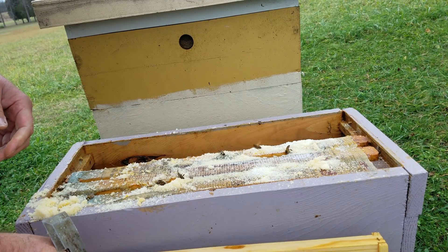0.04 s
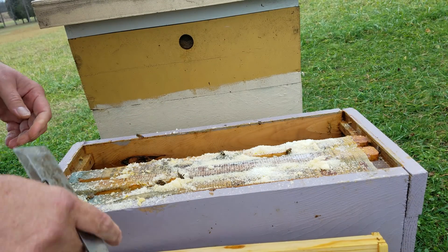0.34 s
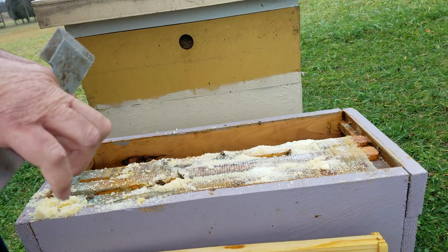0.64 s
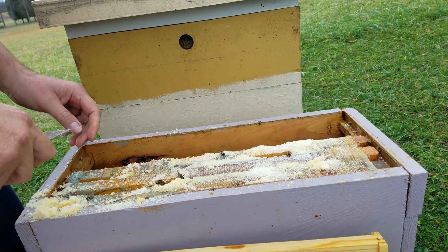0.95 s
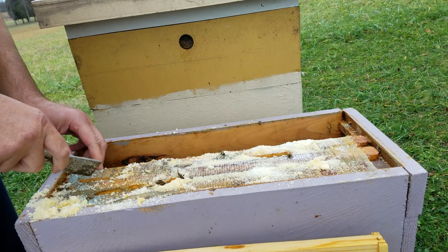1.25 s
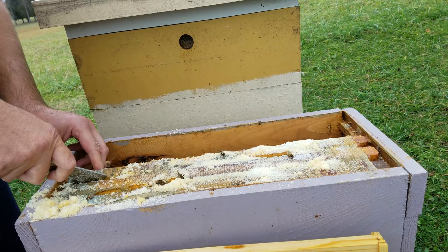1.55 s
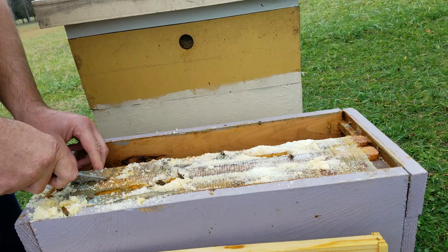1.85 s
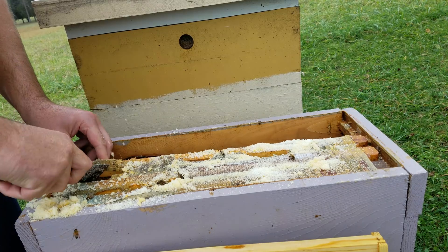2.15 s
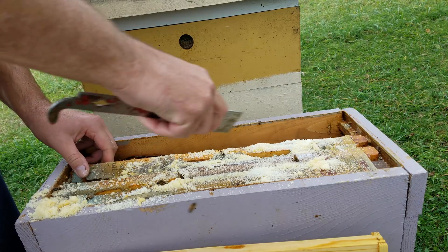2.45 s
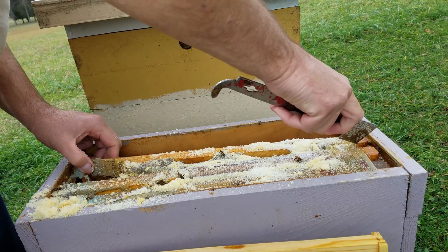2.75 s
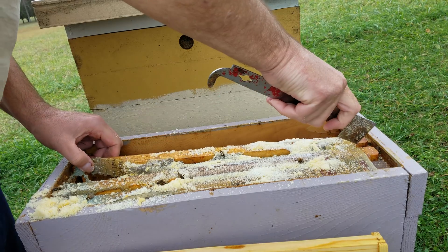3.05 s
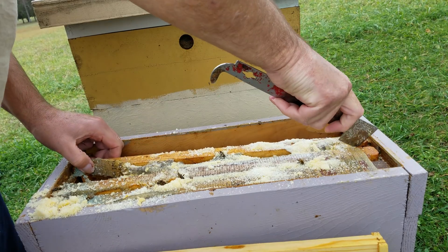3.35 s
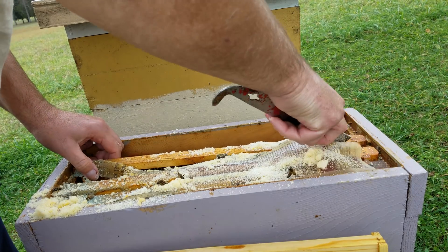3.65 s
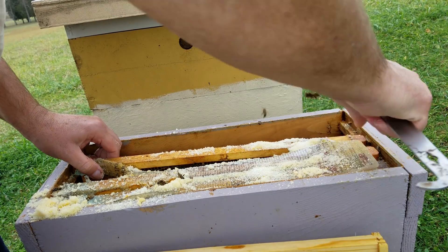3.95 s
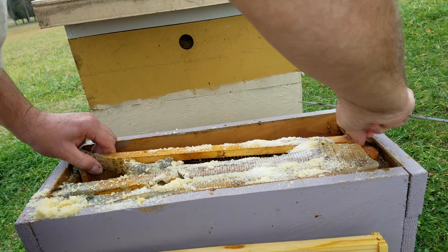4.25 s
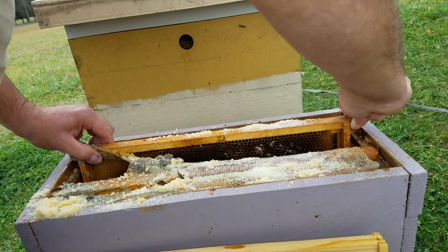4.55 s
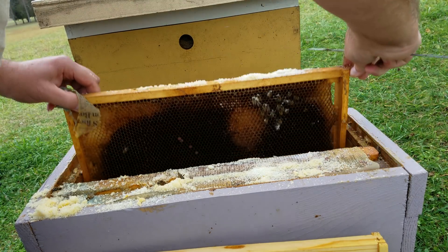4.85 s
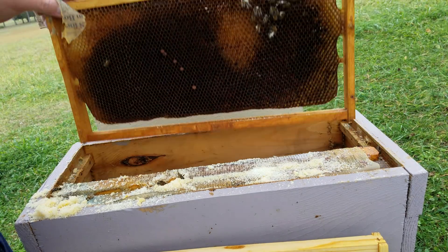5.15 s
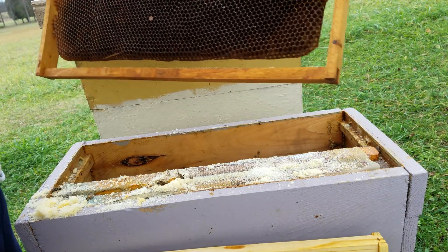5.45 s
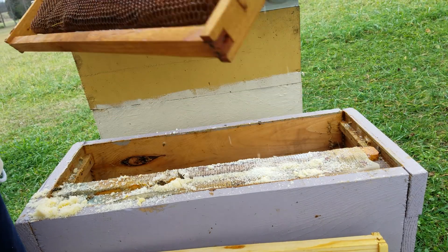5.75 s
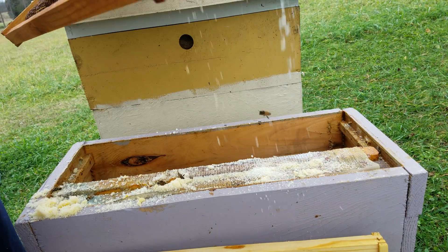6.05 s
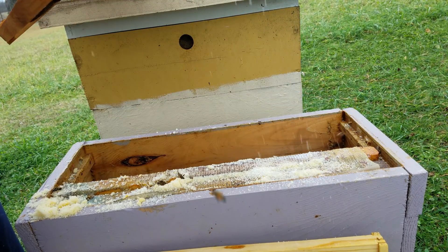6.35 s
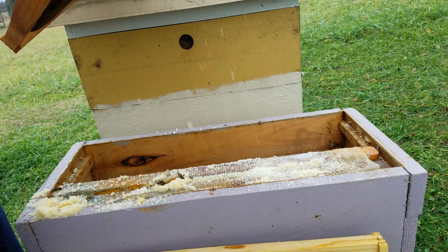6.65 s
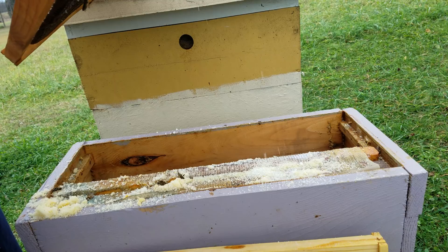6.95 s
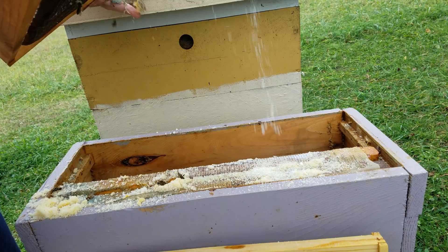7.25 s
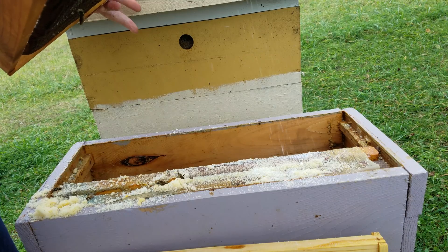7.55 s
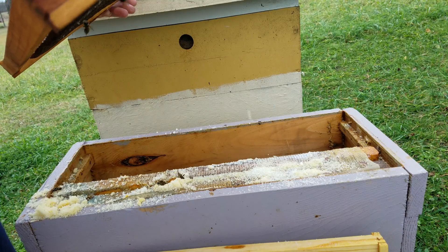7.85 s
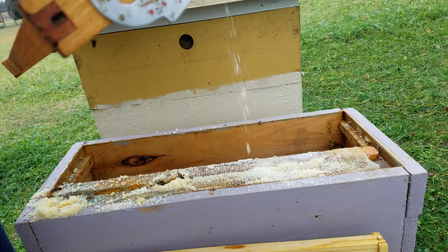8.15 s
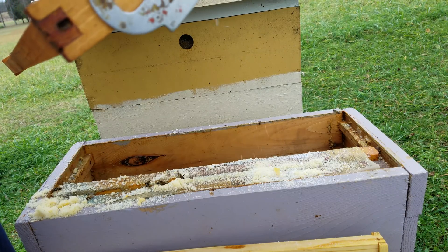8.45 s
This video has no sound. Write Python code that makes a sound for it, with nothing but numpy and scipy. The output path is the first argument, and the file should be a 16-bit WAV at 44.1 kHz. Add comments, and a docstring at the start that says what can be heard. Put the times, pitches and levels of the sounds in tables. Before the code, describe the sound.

Honeybees hum softly around an open hive outdoors, with a brief gust on the microphone at first. Close by, a steel tool scrapes wax and pries at a wooden frame, which breaks loose with sharp cracks and hollow knocks. After more scraping and crackling wax, the hum grows and single bees fly past. Drops patter lightly from the lifted comb, and a few small wooden taps follow.

```python
"""Honeybees hum around an open hive on a lawn, each wingbeat radiating a series of harmonics.
A steel hive tool pries a wooden frame loose: wax scrapes by stick-slip friction, the propolis seal
snaps, and blows excite the damped modes of box and frames. The hum grows as the frame comes out,
and drops fall from the lifted comb. A small gust brushes the microphones at first;
behind it all lie a soft outdoor wash and a faint low drone."""
import sys
import numpy as np
from scipy import signal
from scipy.fft import rfft, irfft
from scipy.io import wavfile
from scipy.ndimage import uniform_filter1d

SR = 44100
rng = np.random.default_rng(int(sys.argv[2]) if len(sys.argv) > 2 else 0)


def generate_wav(signal):
    """Clip the signal to [-1, 1] and save it as 16-bit WAV at the path in sys.argv[1]."""
    frames = np.transpose(np.atleast_2d(signal))
    scaled = np.clip(frames, -1, 1) * 32767
    pcm = np.round(scaled).astype(np.int16)
    wavfile.write(sys.argv[1], SR, pcm)


N = 378818
TIME = np.arange(N) / SR
LIFT_START_S, LIFT_DURATION_S = 2.5, 0.73
LIFTED = np.clip((TIME - LIFT_START_S) / LIFT_DURATION_S, 0, 1)  # 0: frame in the box, 1: frame out

# Spectrum of wood's densely overlapping modes: f/Hz, level/dB
WOOD_SPECTRUM = [(20, -52), (60, -12), (125, -9), (300, -0.5), (650, -2.5), (1000, -7), (1600, -10),
                 (2400, -9.5), (3300, -14), (4500, -20), (16000, -33)]
# Spectrum of tiny, sharp clicks: f/Hz, level/dB
CLICK_SPECTRUM = [(300, -60), (1500, 17), (3000, -0.5), (4300, 8.5), (5500, 3), (7000, 7.5), (8200, 1),
                  (9400, -8), (11000, -2), (13000, 0), (15800, -5.5)]


def amp(db):
    """Amplitude ratio of a level: a factor of ten per 20 dB."""
    return 10 ** (np.asarray(db) / 20)


def unit_rms(x):
    """Normalisation to unit mean power."""
    return x / np.sqrt(np.mean(x ** 2) + 1e-20)


def value_at(curve, hz):
    """Interpolation of a curve on a logarithmic frequency axis."""
    f, value = np.transpose(curve)
    return np.interp(np.log(hz + 1), np.log(f + 1), value)


def coloured(x, spectrum):
    """Filtering by multiplication in the frequency domain, at unit rms."""
    hz = np.fft.rfftfreq(x.shape[-1], 1 / SR)
    return unit_rms(irfft(rfft(x) * amp(value_at(spectrum, hz)), x.shape[-1]))


def drift(corner_hz, size=1024):
    """Slow random modulation: low-passed noise of unit rms."""
    hz = np.fft.rfftfreq(size, TIME[-1] / size)
    slow = irfft(rfft(rng.standard_normal(size)) / (1 + (hz / corner_hz) ** 2))
    return np.interp(TIME, np.linspace(0, TIME[-1], size), unit_rms(slow))


def noise(spectrum, size=384000):
    """Spatial coherence: two spaced microphones get alike bass but nearly unrelated treble."""
    # Likeness of left and right: f/Hz, coherence
    coherence_curve = [(40, 0.91), (130, 0.93), (290, 0.93), (640, 0.035), (1400, -0.24), (3000, 0.029),
                       (15000, 0.029)]
    left, independent = rfft(rng.standard_normal((2, size)))
    coherence = np.clip(value_at(coherence_curve, np.fft.rfftfreq(size, 1 / SR)), -1, 1)
    right = coherence * left + np.sqrt(1 - coherence ** 2) * independent
    return coloured(irfft([left, right]), spectrum)[:, :N]


def crackle(spectrum, per_s, spread_db, grain_s, size=384000):
    """A Poisson process: decaying noise bursts of uneven size arrive at random and add in power."""
    sizes = amp(spread_db * np.minimum(rng.exponential(1, size), 4))
    onsets = rng.random(size) < per_s / SR
    power = signal.lfilter([1], [1, -np.exp(-2 / (grain_s * SR))], (sizes * onsets) ** 2)
    return coloured(np.sqrt(power) * rng.standard_normal((2, size)), spectrum)[:, :N]


def swells(rows, range_db):
    """Exponential envelopes: each gains range_db over its rise time and loses it over its fall time."""
    return sum(amp(db - range_db * np.maximum((s - TIME) / rise_s, (TIME - s) / fall_s))
               for s, rise_s, fall_s, db in rows)


def outdoors(wash_db=-49.5, hiss_db=-63.8, gust_db=-46, gust_hold_s=.24, gust_fall_db_per_s=36):
    """Broadband noise: a distant wash, a fine hiss and one turbulent gust, stronger on the right."""
    # Spectra of the wash, the gust at the microphones and the hiss: f/Hz, level/dB
    wash_spectrum = [(20, -1), (33, -30), (46, 0), (60, -4.5), (90, 0.5), (125, -4), (175, -10), (250, -7),
                     (340, -9), (480, -4), (780, -4), (1200, -6), (2000, -16.5), (4000, -32.5)]
    gust_spectrum = [(20, -26), (32, -16), (45, -7), (85, -2), (140, -15), (220, -16.5), (400, -24),
                     (1000, -48), (4000, -90)]
    hiss_spectrum = [(500, -22), (2500, -6.5), (4500, 2.5), (6000, -1.5), (7600, 0), (8600, -7),
                     (9800, -5.5), (11500, -0.5), (14000, 4.5), (15700, 4)]
    wash = noise(wash_spectrum + [(16000, -63)]) * amp(wash_db + 0.64 * drift(18))
    dying_db = gust_db - gust_fall_db_per_s * np.maximum(TIME - gust_hold_s, 0)
    gust = noise(gust_spectrum) * amp(dying_db + 6.5 * drift(11))
    hiss = noise(hiss_spectrum) * amp(hiss_db)
    return wash * amp([[-.3], [.3]]) + gust * amp([[-2.5], [1.5]]) + hiss * amp([[.6], [-.6]])


def drone(hz=52, db=-65.5, waver=0.053):
    """A far, low tone, made unsteady by random frequency modulation."""
    turns = np.cumsum(hz * (1 + waver * drift(2.6))) / SR
    return amp(db) * unit_rms(np.sin(2 * np.pi * turns))


def bee(wing_hz, lag_s, spectrum, harmonics=14, size=2048):
    """Periodic wingbeats radiate harmonics; a path difference offsets the two channels by lag_s."""
    k, cycle = np.arange(1, harmonics + 1), np.arange(size) / size
    partials = np.cos(2 * np.pi * (np.outer(k, cycle) + rng.random((harmonics, 1))))
    wingbeat = unit_rms(amp(value_at(spectrum, k * wing_hz.mean())) @ partials)
    turns = np.cumsum(wing_hz) / SR
    stereo_turns = np.array([turns, turns + wing_hz * lag_s])
    return wingbeat[(stereo_turns * size).astype(int) % size]


def swarm(slow_hz=218, fast_hz=264, count=9, wander=.025, nearness_db=4, calm_db=-59.5, stirred_db=-56):
    """Circling bees of unequal pitch beat against one another; the hum grows as the frame lifts."""
    # Harmonic envelope of the swarm's wingbeats: f/Hz, level/dB
    buzz_spectrum = [(240, -8), (490, -2.5), (740, -5.5), (1000, -4.5), (1250, -11), (1700, -16),
                     (2500, -24), (4000, -34)]
    hum = np.zeros((2, N))
    for hz in np.linspace(slow_hz, fast_hz, count):
        wing_hz = hz * (1 + wander * drift(1.5))
        lag_s = rng.uniform(-0.00054, 0.00048)
        hum += bee(wing_hz, lag_s, buzz_spectrum) * amp(nearness_db * drift(0.64))
    return unit_rms(hum) * amp(calm_db + (stirred_db - calm_db) * LIFTED) * amp([[-1.2], [1.2]])


def fanning(wing_hz=234, waver=.012, open_db=-69, shielding_db=5, flutter_db=2.5):
    """Shielding: bees fanning in the box hold one soft note, quieter while the frame covers them."""
    # Harmonic envelope of fanning wings: f/Hz, level/dB
    fan_spectrum = [(234, 0), (470, -7), (700, -5), (940, -12), (1400, -20), (3300, -40)]
    buzz = bee(wing_hz * (1 + waver * drift(6)), lag_s=.0002, spectrum=fan_spectrum)
    level_db = open_db - shielding_db * (1 - LIFTED) + flutter_db * drift(13)
    return buzz * amp(level_db) * amp([[-1], [1]])


def flybys(doppler=.006, edge_drop_db=21, flutter_db=3):
    """Doppler effect: a passing bee is sharp as it swells, flat as it fades; turning bends its pitch."""
    # Close passes: nearest t/s, time to edge of earshot/s, wingbeat f/Hz, bend at that edge/Hz,
    # waver as a share of the wingbeat, level/dB
    passes = [(.4, .9, 207, 0, .004, -63), (.48, .6, 264, -1, .002, -59), (1.25, .25, 228, -3, .008, -59),
              (2, 2.2, 260, -1, .004, -64), (3.98, .3, 242, -25, .008, -54.5),
              (4.24, .17, 231, -5, .011, -54.5), (4.9, .5, 259, 0, .003, -62),
              (4.9, .25, 231, 4, .012, -60), (5.38, .3, 253, 4, .01, -54.5),
              (5.58, .25, 232, 12, .012, -60), (5.82, .28, 251, 1, .005, -54),
              (5.98, .28, 227, 30, .011, -58), (6.22, .17, 243, -8, .012, -53.5),
              (6.52, .3, 249, -2, .015, -56), (6.85, .3, 236, 8, .012, -58.5),
              (7.1, .55, 253, -12, .017, -58.5), (7.65, .22, 236, -7, .011, -58),
              (8.23, .32, 242, -4, .009, -56)]
    # Harmonic envelope of one bee close by: f/Hz, level/dB
    near_spectrum = [(240, -11), (490, 0), (740, -11), (1000, -7), (1250, -13), (1700, -18), (2500, -25),
                     (4000, -34)]
    out = np.zeros((2, N))
    for s, reach_s, hz, bend_hz, waver, db in passes:
        place = (TIME - s) / reach_s
        wing_hz = hz + bend_hz * np.minimum(place ** 2, 1)
        heard_hz = wing_hz * (1 - doppler * np.tanh(2 * place) + waver * drift(10))
        lag_s = rng.uniform(-0.00047, 0.00024)
        buzz = bee(heard_hz, lag_s, near_spectrum)
        # echoes off the box make the buzz flutter differently at each microphone
        flutter = (drift(23) + np.array([drift(23), drift(35)])) / np.sqrt(2)
        out += buzz * amp(db - edge_drop_db * place ** 2 + flutter_db * flutter)
    return out * amp([[-1.3], [1.3]])


def add(mix, s, sound):
    """Superposition: a stereo sound joins the mix at time s."""
    part = mix[:, max(round(s * SR), 0):][:, :sound.shape[1]]
    part += sound[:, :part.shape[1]]


def clink(s=.181, db=-62, t60=.1, size=8192):
    """Free vibration: three modes of the steel tool ring faintly as it is picked up."""
    out, t = np.zeros((2, N)), np.arange(size) / SR
    hz = np.array([4200, 6550, 7980])[:, None]
    modes = np.sin(2 * np.pi * (hz * t + rng.random((2, len(hz), 1))))
    add(out, s, amp(db - 60 * t / t60) * modes.sum(1))
    return out


def scrape(steel_db=-8, grit_db=-12):
    """Stick-slip friction: the blade drags through wax, and its gritty slips excite the steel's modes."""
    # Spectrum of the drag: f/Hz, level/dB
    drag_spectrum = [(100, -24), (250, -4), (700, 3), (1500, 9.5), (2500, 3.5), (4200, -3), (7200, -9),
                     (9400, -11.5), (12000, -7), (15800, -18)]
    # Resonances of the blade: f/Hz, bandwidth/Hz, level/dB
    blade_modes = [(2330, 60, -6), (3780, 95, -1), (4150, 96, -3), (5270, 70, -1), (6130, 100, 2),
                   (6690, 70, -2), (7150, 250, -7)]
    # Pushes of the blade: peak t/s, rise/s, fall/s, level/dB
    strokes = [(1.125, 0.08, 0.081, -52.5), (1.29, 0.13, 0.091, -56.5), (1.88, 0.27, 0.23, -66),
               (2.44, 0.09, 0.16, -57.5), (3.1, .012, 0.33, -54.5), (3.18, 0.2, 0.14, -51)]
    drag = crackle(drag_spectrum, per_s=1900, spread_db=2, grain_s=.003)
    slips = crackle(CLICK_SPECTRUM, per_s=320, spread_db=2, grain_s=.0009)
    steel = unit_rms(sum(amp(db) * signal.lfilter(*signal.iirpeak(hz, hz / width, fs=SR), slips)
                         for hz, width, db in blade_modes))
    return (drag + amp(steel_db) * steel + amp(grit_db) * slips) * swells(strokes, range_db=33)


def struck_wood(modes, cutoff_hz, dense_db, dense_t60, rise_s, apart_hz, ring_share=1, size=10800):
    """Modal response: distinct modes ring over a dense cloud; a soft blow reaches only the low ones."""
    t = np.arange(size) / SR
    hz, db, t60 = np.transpose(modes)[:, :, None]
    # neighbouring modes swing opposite ways; high ones reach the two microphones out of step
    sign = np.cos(np.pi * np.arange(len(modes)))[:, None]
    apart_rad = np.minimum(hz / apart_hz / 2, 1)
    swing = sign * np.sin(2 * np.pi * hz * t + np.array([-apart_rad, apart_rad]))
    ring = (amp(db - 60 * t / (t60 * ring_share)) * swing).sum(1)
    dense = noise(WOOD_SPECTRUM, size=size) * amp(dense_db - 60 * t / (dense_t60 * ring_share))
    blow = (ring + dense) * (1 - np.exp(-t / rise_s))
    return signal.lfilter(*signal.butter(2, cutoff_hz, fs=SR), blow)


def bumps():
    """Impact excitation: the loose frame bumps against wood and gives a short, hollow ring."""
    # Modes of a frame: f/Hz, level/dB, T60/s
    frame_modes = [(189, -8.5, 0.18), (231, -2, 0.13), (311, -4.5, 0.17), (423, -4.5, 0.091),
                   (560, -8, .05), (632, 0, 0.092), (700, 10, 0.046), (709, 9.5, 0.04), (854, 4.5, 0.024),
                   (1300, 4, 0.038), (1470, 3, 0.043), (2480, -16, 0.012)]
    # Contacts: t/s, strength/dB, cutoff f/Hz (higher is harder)
    contacts = [(1.062, -40, 750), (1.083, -47, 610), (1.108, -49, 700), (1.1335, -37.5, 850),
                (1.151, -45, 600), (1.228, -48, 500), (1.26, -49, 700), (2.463, -46, 700),
                (2.992, -40.5, 750), (3.09, -47, 1200), (3.116, -40, 450), (3.162, -40.5, 380),
                (3.222, -44, 520), (3.939, -48, 298), (4.94, -48, 400), (5.01, -47, 380), (5.151, -47, 380),
                (8.1118, -41, 2000), (8.1155, -40.5, 330)]
    out = np.zeros((2, N))
    for s, db, cutoff_hz in contacts:
        bump = struck_wood(frame_modes, cutoff_hz, dense_db=-3, dense_t60=0.11,
                           rise_s=0.0013, apart_hz=1400)
        add(out, s, amp(db) * bump)
    return out


def crumbs():
    """Sparse random impulses: bits of wax break off under the tool, and tiny drops fall later."""
    # Spells of ticking: peak t/s, rise/s, fall/s, level/dB
    spells = [(1.45, .35, .8, -66), (6.3, .3, .6, -69), (7.4, .4, 1.2, -73)]
    return crackle(CLICK_SPECTRUM, per_s=40, spread_db=3, grain_s=.003) * swells(spells, range_db=9.5)


def tick(t60, wood_db, tilt_db, ragged_db=5, rise_s=0.000095, pivot_hz=8000, size=8192):
    """A broadband transient: a ragged run of clicks, faint scatter from the box and a woody decay."""
    t = np.arange(size) / SR
    spectrum = [(hz, db + tilt_db * np.log2(hz / pivot_hz)) for hz, db in CLICK_SPECTRUM]
    roughness = unit_rms(uniform_filter1d(rng.standard_normal(size), size=30))
    decay = amp(-60 * t / t60)
    ragged = decay * amp(ragged_db * np.clip(roughness, -2, 2))
    ragged *= np.linalg.norm(decay) / np.linalg.norm(ragged)  # same energy as the smooth decay
    scatter = amp(-30 - 60 * t / 0.25)
    crack = noise(spectrum, size=size) * (ragged + scatter)
    wood = noise(WOOD_SPECTRUM, size=size) * amp(wood_db - 60 * t / 0.094)
    return (crack + wood) * (1 - np.exp(-t / rise_s))


def clicks(t60=0.02):
    """Fracture and impact: the pried seal cracks, then the lifted frame taps and knocks against wood."""
    # Sharp clicks: t/s, level/dB, relative wood level/dB, tilt/(dB per octave)
    transients = [(1.2097, -31.5, -14, 14.5), (1.298, -48, -12, 2), (1.329, -52, -20, 10),
                  (1.403, -27, -11, 14), (1.4164, -36.5, -7, 9), (1.432, -43.5, -20, 11),
                  (1.5228, -42.5, -4, 7), (1.528, -41, -21, 7), (1.5695, -54, -20, 8),
                  (1.595, -49, -20, 14), (1.649, -21.5, -26, 1), (1.6544, -22, 0, 11),
                  (1.6741, -18, -12, 8.5), (1.7494, -41.5, -1.5, 15), (1.781, -37.5, -29, 7.5),
                  (2.121, -50, -30, 6), (3.0904, -38.5, -8, 11), (3.1392, -41, -10, 10),
                  (3.177, -34.5, -26, 6), (3.296, -51, -20, 9), (3.371, -49, -10, 8),
                  (3.389, -48.5, -18, 17), (3.6829, -61, -15, 3), (3.698, -53, -10, 18),
                  (3.858, -48.5, -27, 6.5), (5.009, -49.5, -3, 6), (5.08, -55, -15, 2),
                  (5.748, -39.5, -6, -1), (7.07, -47, -10, -2), (7.309, -53, -14, 0), (7.319, -52, -14, -5),
                  (7.9257, -45.5, -8, 3), (7.934, -43, -6, 6), (8.111, -30, -16, -5.5),
                  (8.122, -43, -22, 10), (8.4522, -40.5, -12, -0.5)]
    out = np.zeros((2, N))
    for s, db, wood_db, tilt_db in transients:
        add(out, s, amp(db) * tick(t60, wood_db, tilt_db))
    return out


def knocks(lowest_hz=62):
    """Damped resonance: blows through the tool ring the hive, and a tight grip cuts the ring short."""
    # Modes of box, frames and blade together: f/Hz, level/dB, T60/s
    hive_modes = [(140, -5, .05), (189, 1.5, .125), (240, 2, .085), (270, -1, .075), (320, -6.5, .095),
                  (385, -10, .07), (423, -5, .1), (472, -12, .055), (571, 0, .065), (629, 3.5, .045),
                  (667, 0, .08), (722, -.5, .06), (845, 2.5, .055), (880, 2, .07), (958, -11, .13),
                  (1005, -5, .063), (1089, -4, .055), (1141, -3, .055), (1380, -5, .035), (1770, -8, .055),
                  (1927, -8, .05), (2135, 1, .043), (2195, 3, .043), (2530, 0, .035), (2610, 1, .045),
                  (2780, -1, .04), (3190, -1, .045), (3450, -4, .05)]
    # Blows: t/s, strength/dB, cutoff f/Hz, share of the free ring time, direction (1 push, -1 rebound)
    blows = [(1.404, -56, 3000, 1, 1), (1.435, -46.5, 1200, 0.74, 1), (1.6499, -21, 600, 0.82, 1),
             (1.6533, -13, 1640, 0.58, 1), (1.6739, -19.5, 4100, 0.87, -1), (1.6896, -28, 1800, 0.61, 1),
             (1.692, -20.5, 210, 0.76, 1), (1.749, -39, 2000, 0.31, 1), (3.111, -46, 445, 0.76, 1)]
    out = np.zeros((2, N))
    for s, db, cutoff_hz, ring_share, direction in blows:
        knock = struck_wood(hive_modes, cutoff_hz, dense_db=0, dense_t60=0.1,
                            rise_s=0.0011, apart_hz=1700, ring_share=ring_share)
        add(out, s, direction * amp(db) * knock)
    # the box is too small to radiate deep bass
    return signal.lfilter(*signal.butter(2, lowest_hz, "high", fs=SR), out) * amp([[-.5], [.5]])


def patter():
    """Shot noise: dense tiny bursts merge into a fine crackle or hiss that comes in spells."""
    # Spectrum of the crackle: f/Hz, level/dB
    patter_spectrum = [(300, -25), (1500, -6), (3000, -2), (4300, -2), (5500, -4), (7200, -2), (8400, -7),
                       (9400, -10), (11000, -5), (13000, 1), (15800, 4.5)]
    # Spells of fine crackle (tearing wax, then spattering drops), and a long faint rise of the treble hiss
    # after 3.1 s: peak t/s, rise/s, fall/s, level/dB
    spells = [(3.17, .09, .15, -56), (3.3, .25, .6, -58.5), (3.705, .06, .06, -54.5), (3.72, .4, .25, -64),
              (4, .2, .3, -62), (4.6, .9, 1, -67), (5.48, .05, .1, -66), (5.92, .3, .38, -51),
              (6.3, .25, .3, -58), (6.64, .2, .3, -65), (7.07, .05, .1, -60.5), (7.31, .12, .15, -60)]
    return crackle(patter_spectrum, per_s=2400, spread_db=3, grain_s=.0015) * swells(spells, range_db=16)


def whine(start_s=4, end_s=7.4, fade_s=.35, start_hz=1048, sag_hz_per_s=6.5, db=-66, flutter_db=3):
    """A thin tone sinks slowly within the hum, randomly modulated in frequency and amplitude."""
    hz = start_hz - sag_hz_per_s * (TIME - start_s)
    turns = np.cumsum(hz * (1 + .007 * drift(25))) / SR
    tone = np.sin(2 * np.pi * (turns + np.array([[0], [1 / 8]])))
    fade = np.clip(np.minimum(TIME - start_s, end_s - TIME) / fade_s, 0, 1)
    return unit_rms(tone) * fade * amp(db + flutter_db * drift(18)) * amp([[-2], [1]])


def taps(rise_s=0.00085, apart_rad=1.0, size=4096):
    """Bar vibration: a tap on the lifted frame gives its thin bars a short, high, woody ring."""
    # Modes of the bars: f/Hz, level/dB, T60/s
    bar_modes = [(1500, -7, .03), (2310, 3, .05), (2480, -5, .035), (3330, -2, .04), (3750, -2, .035),
                 (4570, -8, .035), (5130, -7, .035), (6519, -9, .03)]
    # Light taps: t/s, strength/dB, tilt/(dB per octave)
    touches = [(5.0115, -46.5, -1), (5.7485, -55, -3), (8.1135, -46, -15), (8.4525, -53, 0)]
    out, t = np.zeros((2, N)), np.arange(size) / SR
    hz, db, t60 = np.transpose(bar_modes)[:, :, None]
    stereo_phase = np.array([-apart_rad, apart_rad])[:, None, None]
    for s, strength_db, tilt_db in touches:
        swing = np.sin(2 * np.pi * hz * t + rng.uniform(0, 2 * np.pi, hz.shape) + stereo_phase)
        mode_db = db + tilt_db * np.log2(hz / hz.mean())
        ring = (amp(mode_db - 60 * t / t60) * swing).sum(1)
        add(out, s, amp(strength_db) * ring * (1 - np.exp(-t / rise_s)))
    return out


def drops(t60=0.018, wood_db=-12, splash_after_s=0.002):
    """Drop impact: each lands on the frames below with a bright tick and an equal splash just after."""
    # Drops from the lifted comb: t/s, level/dB, tilt/(dB per octave)
    landings = [(5.643, -56, 9), (5.733, -48, 3), (6.1748, -51, 6), (6.193, -52, 4), (6.227, -47, 3),
                (6.233, -54, 8), (6.268, -50, 4), (6.301, -55, 5), (6.32, -48, 9), (6.3403, -47.5, 8),
                (6.349, -51, 6), (6.371, -51, 3), (6.4844, -56, 12), (6.6407, -49.5, 3), (7.027, -50, 14),
                (7.0376, -41.5, 12.5), (7.298, -50, 6), (7.415, -56, 10), (7.481, -53, 15),
                (7.5195, -59, 16), (7.5334, -43, 14), (7.969, -53, 6), (8.416, -47, 16), (8.499, -62, 12)]
    out = np.zeros((2, N))
    for s, db, tilt_db in landings:
        for delay_s in (0, splash_after_s):
            add(out, s + delay_s, amp(db) * tick(t60, wood_db, tilt_db))
    return out * amp([[-.25], [.25]])


def scene():
    """Linear superposition of the bees, the open air and the work on the hive."""
    bees = swarm() + fanning() + flybys() + whine()
    background = outdoors() + drone()
    impacts = clink() + knocks() + bumps() + taps() + clicks() + drops()
    textures = scrape() + patter() + crumbs()
    return bees + background + impacts + textures


def record(dry, edge_hz=16050):
    """Band limiting: a linear-phase low-pass filter removes the highest treble."""
    low_pass = signal.firwin(511, edge_hz, window=("kaiser", 9), fs=SR)
    return signal.oaconvolve(dry, low_pass[None], "same")


dry = scene()
out = record(dry)
generate_wav(out)
```